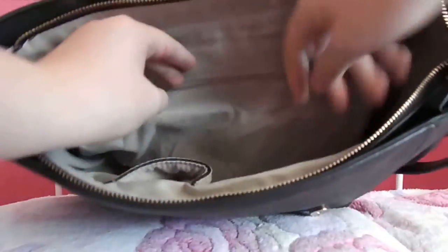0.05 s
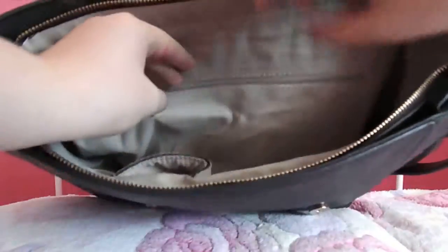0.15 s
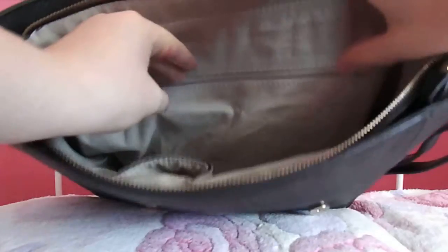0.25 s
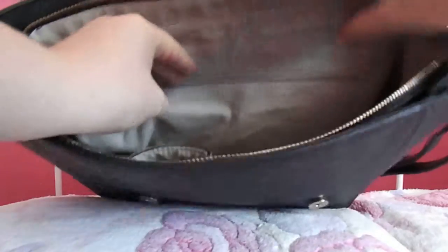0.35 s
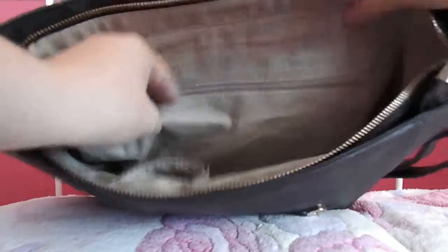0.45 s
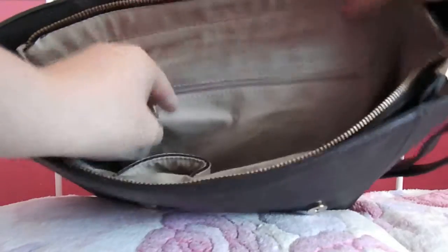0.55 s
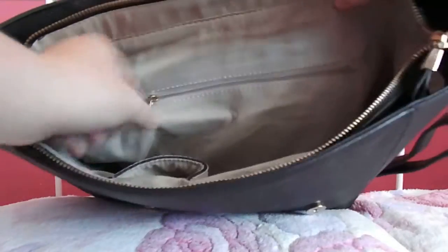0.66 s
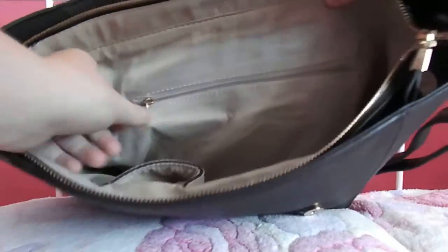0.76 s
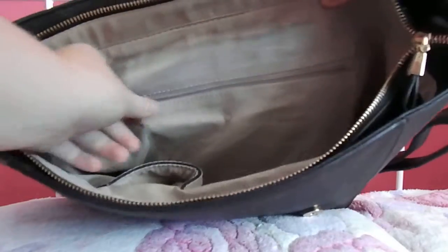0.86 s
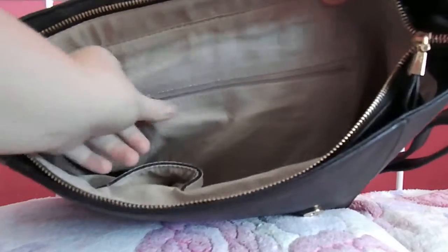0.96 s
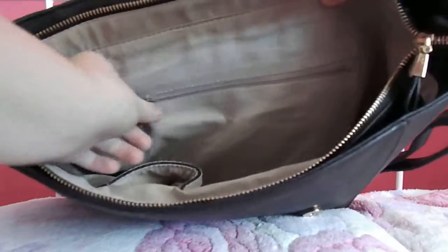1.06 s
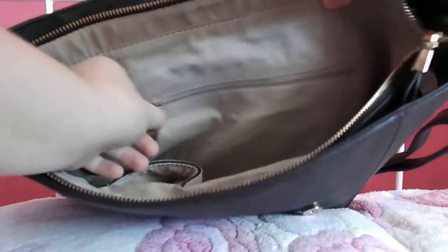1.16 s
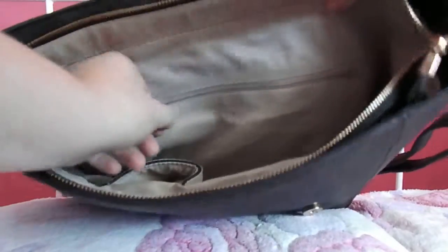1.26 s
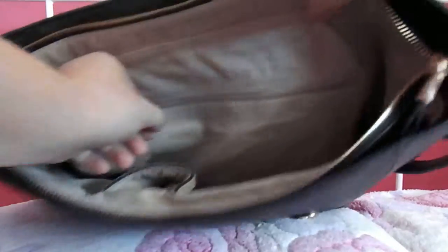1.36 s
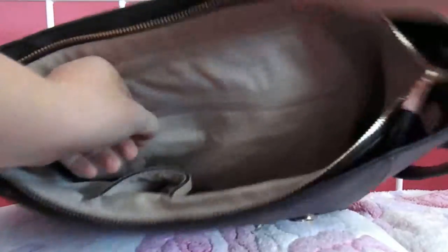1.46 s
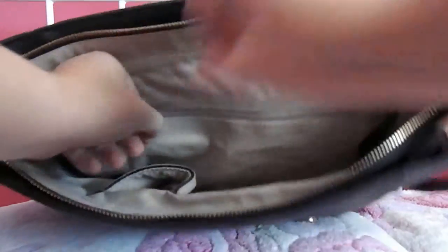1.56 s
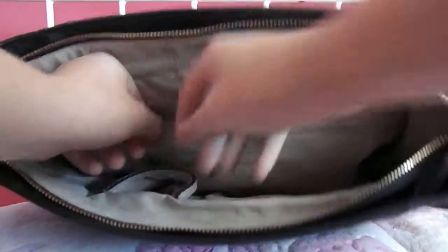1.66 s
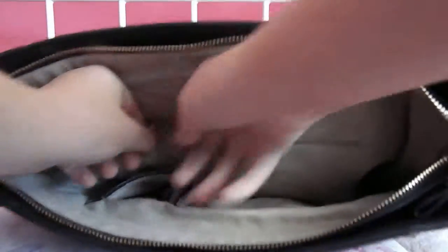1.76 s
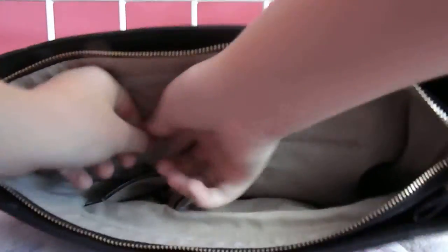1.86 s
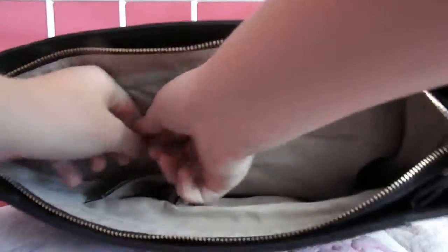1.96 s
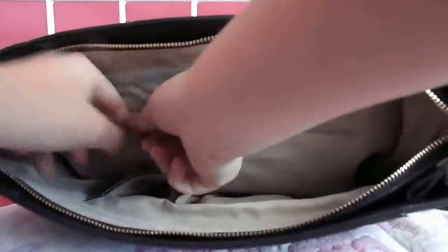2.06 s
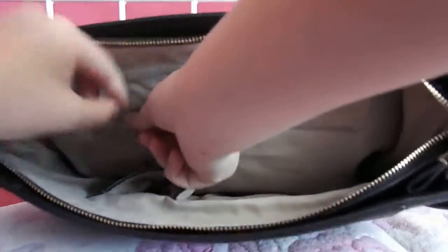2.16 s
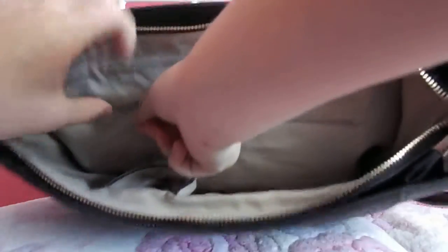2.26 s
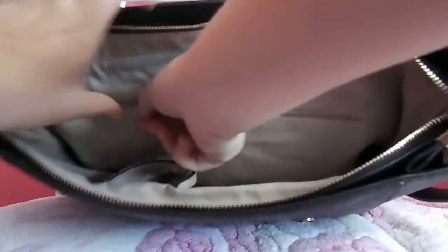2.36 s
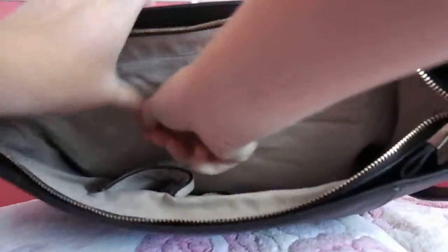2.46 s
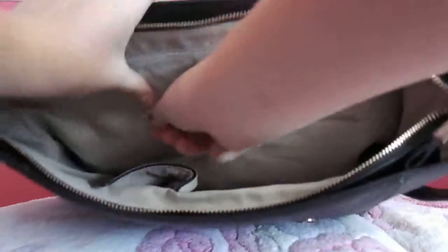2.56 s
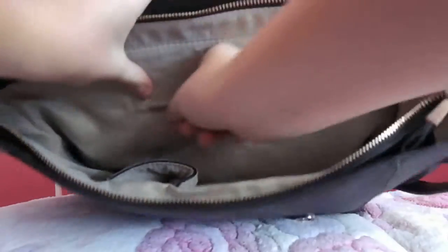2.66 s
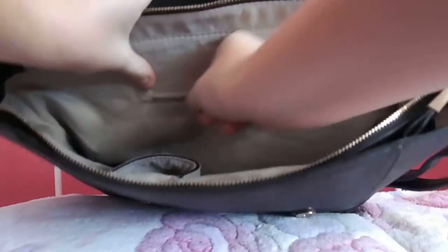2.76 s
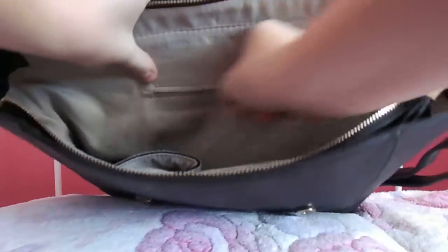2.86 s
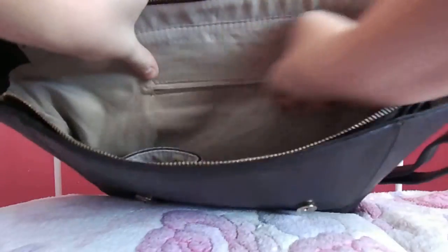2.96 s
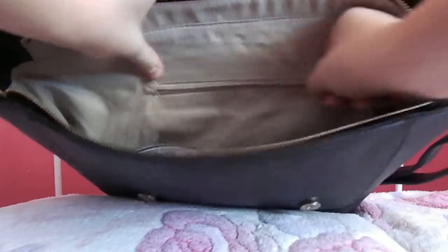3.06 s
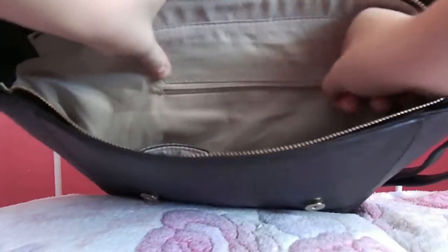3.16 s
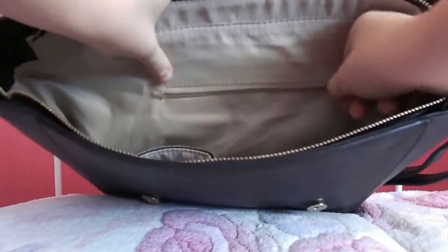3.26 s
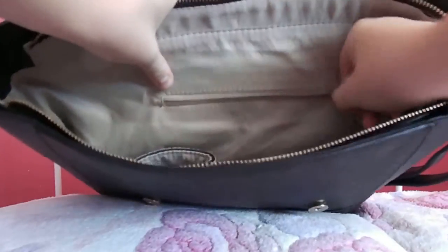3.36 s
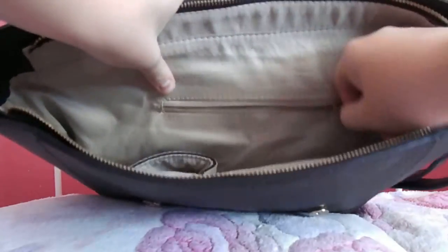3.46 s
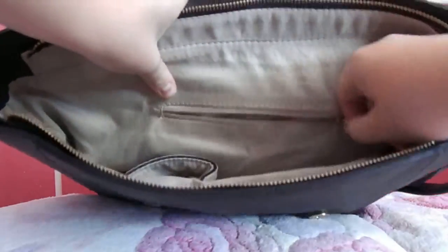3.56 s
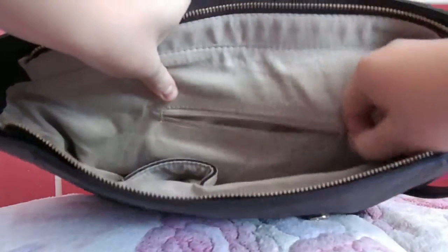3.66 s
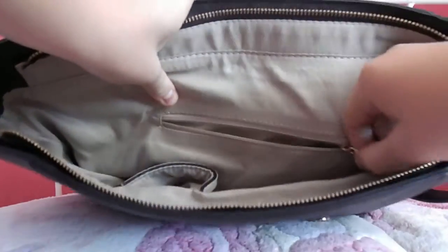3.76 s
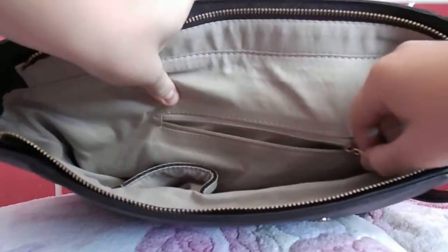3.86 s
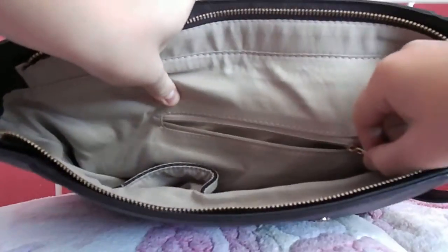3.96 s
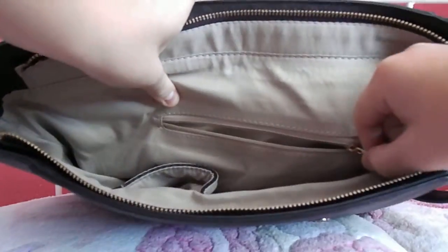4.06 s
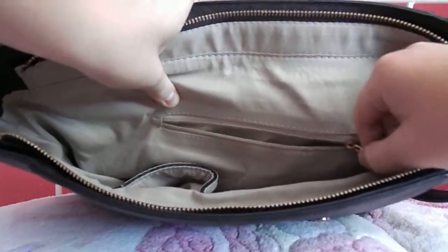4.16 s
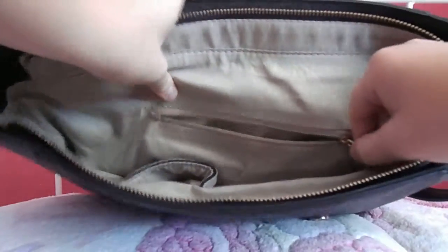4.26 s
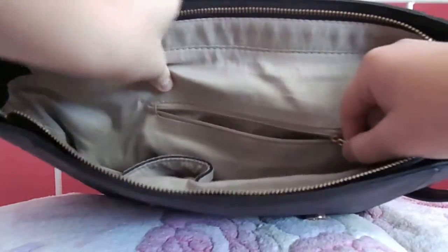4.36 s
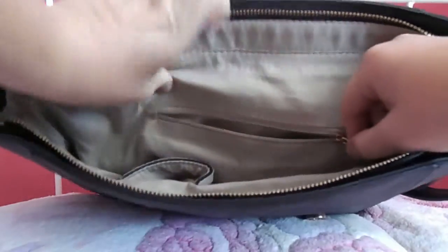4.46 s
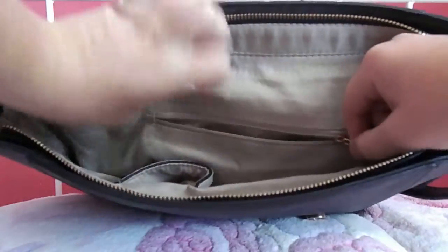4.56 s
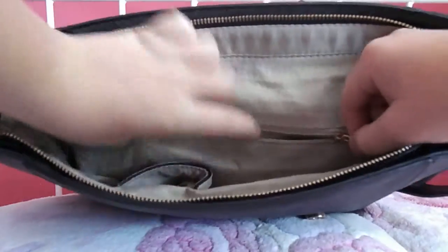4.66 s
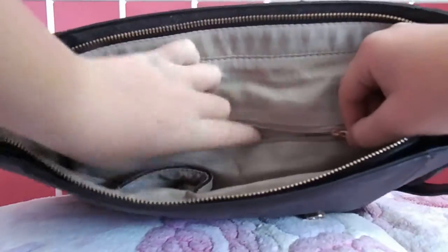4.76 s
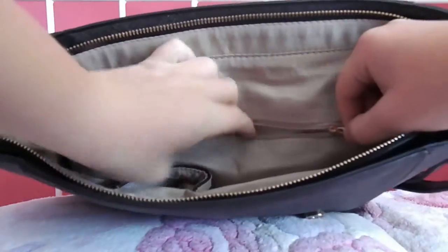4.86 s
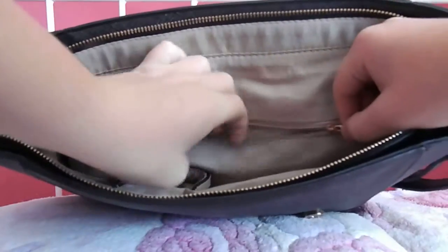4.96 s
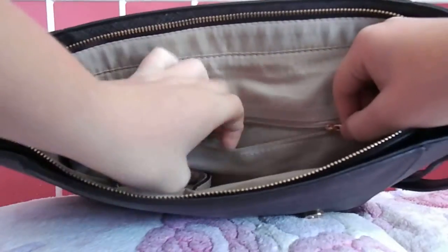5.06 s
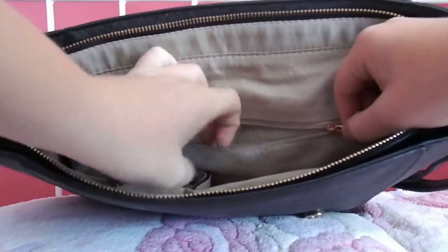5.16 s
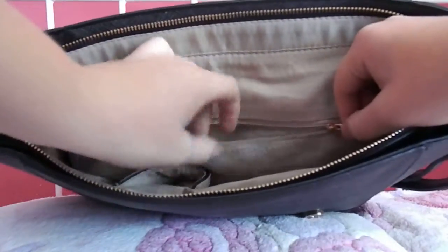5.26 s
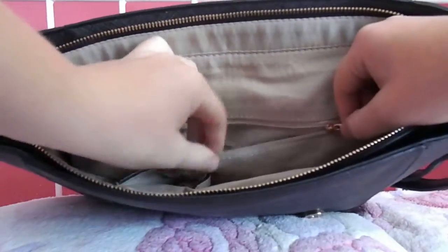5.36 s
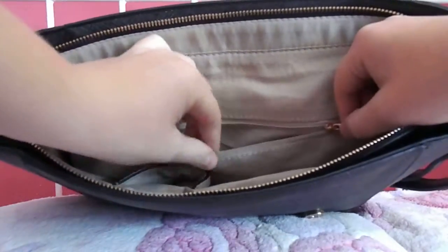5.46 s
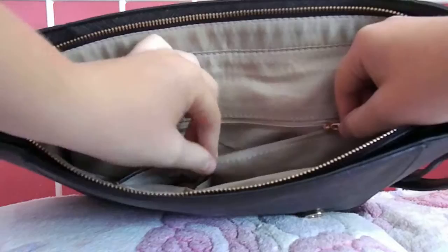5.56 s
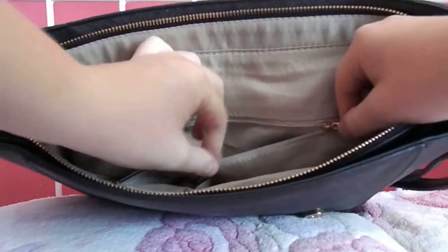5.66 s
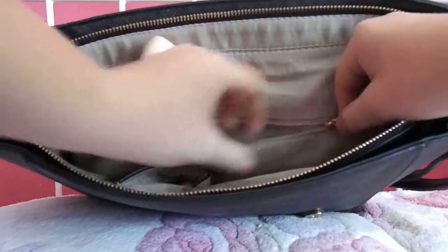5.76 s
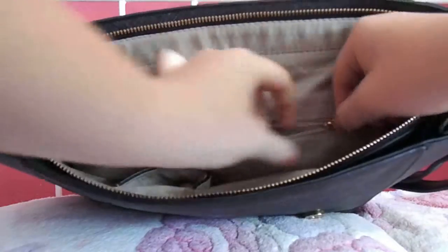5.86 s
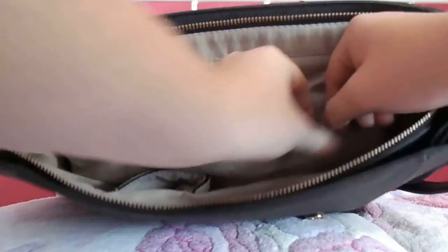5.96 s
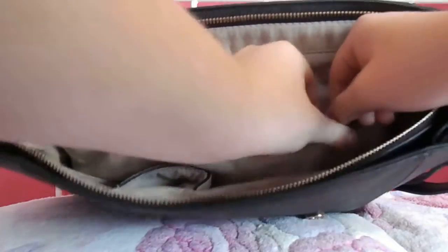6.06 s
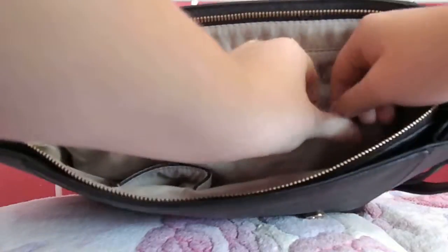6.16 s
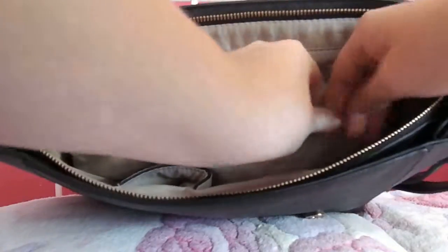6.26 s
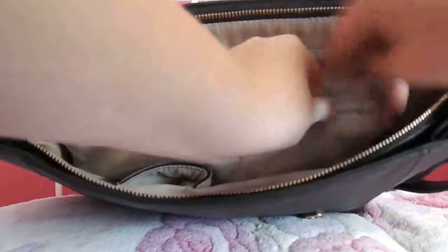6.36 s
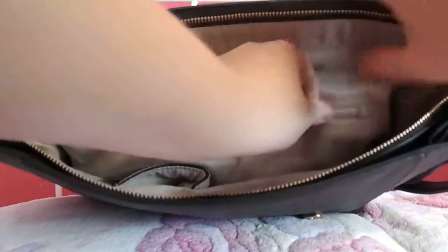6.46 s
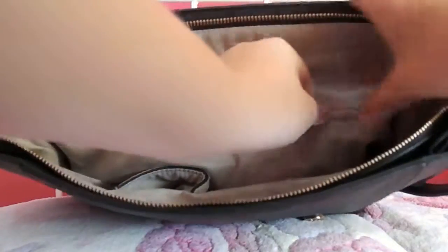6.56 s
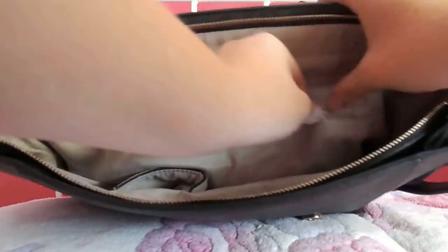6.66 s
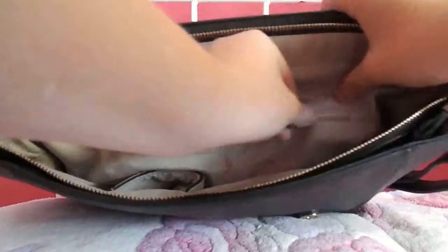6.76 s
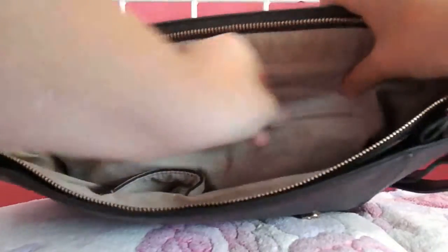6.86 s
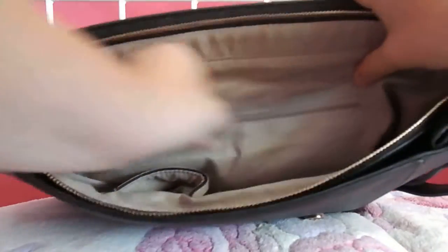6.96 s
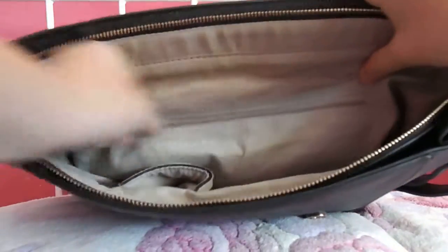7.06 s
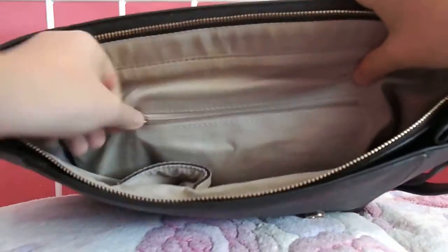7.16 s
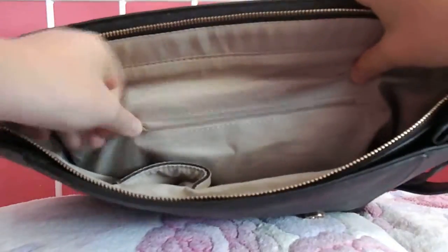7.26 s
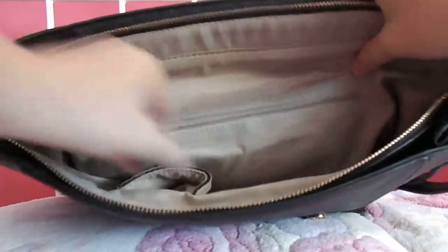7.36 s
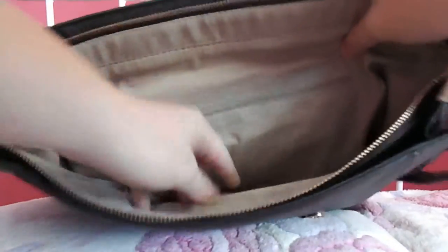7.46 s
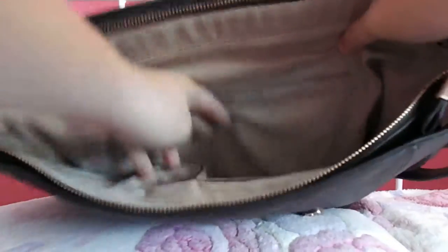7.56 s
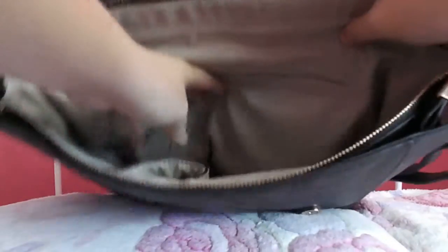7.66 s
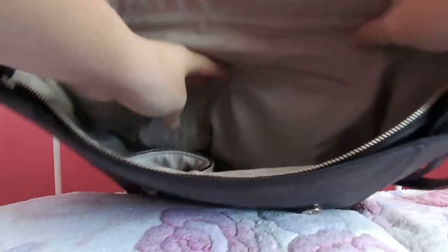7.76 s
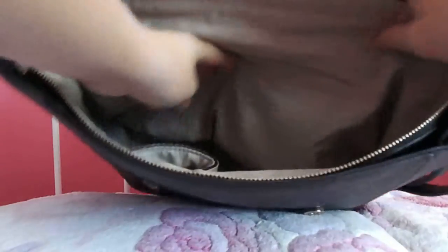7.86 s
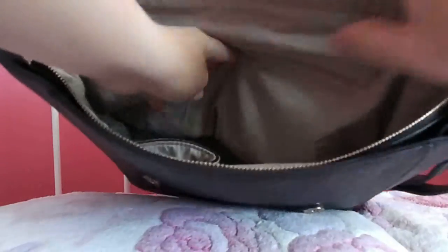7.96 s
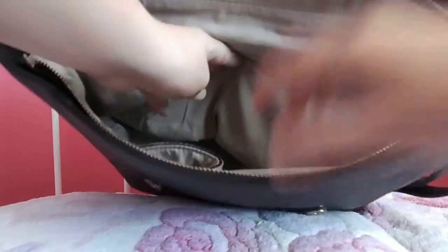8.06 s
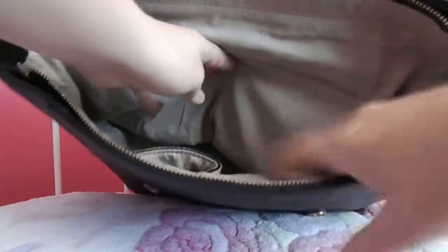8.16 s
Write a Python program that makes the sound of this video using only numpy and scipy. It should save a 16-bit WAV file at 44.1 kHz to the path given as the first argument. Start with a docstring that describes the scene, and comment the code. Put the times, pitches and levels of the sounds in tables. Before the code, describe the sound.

In a quiet small room, very close and mono, hands move inside a lined handbag. From 0 to 2.5 s soft skin-on-cloth swishes come and go with dull bumps, creasing fabric and dry ticks; a thin metal tab clinks near 1 s and chatters at about 1.95 s. At 2.6 s the inner zipper opens: a loose, rattling rasp of half a second that hesitates, speeds up, then slows into separate teeth by 3.1 s. Faint rustling and isolated ticks follow, with a firmer bump at 4.2 s. At 4.53 s one sharp metal snap cracks out, by far the loudest event, with a short bright ring and airy tail. Sparse rubbing continues, busier from 6.2 s with small bumps. At 6.77 s the zipper shuts in under 0.3 s, an even buzz rising in pitch. Tab clinks come around 7.3 s, strong thuds with rough scraping at 7.5 s, then light rustling to the end.

```python
"""Hands in a zippered bag

Inside a lined handbag in a quiet small room, close to a mono microphone: strokes of filtered noise rustle
the lining, impulses with scattered slips make bumps and dry ticks, decaying sines make the tab clink.
The inner pocket's zipper is pulled open and later shut, each tooth a kick and a scrape that buzz at speed.
Between the pulls metal snaps once, sharply; bursts of uneven noise scrape the lining. Near walls answer."""
import sys
import numpy as np
from scipy import signal
from scipy.fft import rfft, irfft
from scipy.io import wavfile
from scipy.ndimage import uniform_filter1d

SR = 44100
rng = np.random.default_rng(int(sys.argv[2]) if len(sys.argv) > 2 else 0)


def bounce(signal):
    """Save signal as a 16-bit WAV file at the path given by the first command-line argument."""
    frames = np.transpose(np.atleast_2d(signal))
    limited = np.clip(frames, -1, 1)
    pcm = np.round(limited * 32767).astype(np.int16)
    wavfile.write(sys.argv[1], SR, pcm)


N = 362590
TIME = np.arange(N) / SR


def from_db(db):
    """Decibels to gain."""
    return 10 ** (np.asarray(db) / 20)


def rms_one(x):
    """Scale to unit power."""
    return x / np.sqrt(np.mean(x ** 2) + 1e-20)


def peak_one(x):
    """Scale to unit height."""
    return x / (np.abs(x).max() + 1e-20)


def in_time(rows, t):
    """The columns of a curve at times t."""
    s, *columns = np.transpose(rows)
    return [np.interp(t, s, column) for column in columns]


def add(out, s, sound):
    """Mix a sound in at time s."""
    start = int(s * SR)
    out[start:start + len(sound)] += sound[:N - start]


def colour(x, spectrum, tilt_db=0, size=2048):
    """Causal (minimum-phase) filter with the given spectrum, tilted in dB per octave."""
    hz, db = np.transpose(spectrum)
    octave = np.log2(np.maximum(np.arange(size // 2 + 1), .5) * SR / size)
    # beyond its end points the spectrum falls by 20 dB per octave
    below = np.maximum(np.log2(hz[0]) - octave, 0)
    above = np.maximum(octave - np.log2(hz[-1]), 0)
    tilt = tilt_db * (octave - octave.mean())
    shape_db = np.interp(octave, np.log2(hz), db) - 20 * (below + above) + tilt
    # folding the cepstrum forward in time gives minimum phase
    cepstrum = irfft(np.log(from_db(shape_db)))
    cepstrum[1:size // 2] *= 2
    cepstrum[size // 2 + 1:] = 0
    response = irfft(np.exp(rfft(cepstrum)))
    return signal.oaconvolve(x, response)[:len(x)]


def drift(rate, count):
    """Slow random wander with unit rms, turning about rate times a second."""
    knots = rng.standard_normal(count)
    return rms_one(np.interp(np.arange(count) * rate / SR, np.arange(count), knots))


def fade(t, t60):
    """Exponential decay by 60 dB in t60 seconds."""
    return np.exp(-np.log(1000) * t / max(t60, 1e-4))


def ring(modes, spread_db):
    """Struck body: decaying sines, each with a strength varied at random by spread_db."""
    t = TIME[:SR // 4]
    out = np.zeros(len(t))
    for hz, db, t60 in modes:
        strength = from_db(db + spread_db * rng.normal())
        out += strength * np.sin(2 * np.pi * hz * t) * fade(t, t60)
    return out


PUSH = np.eye(1, SR // 6)[0]   # a single ideal impulse


def knock(spectrum, tilt_db, t60, scatter):
    """A sudden push of height one, then a dying scatter of tiny slips, through the same body."""
    slips = rng.standard_normal(len(PUSH)) * fade(TIME[:len(PUSH)], t60)
    body = peak_one(colour(PUSH, spectrum, tilt_db))
    return signal.oaconvolve(PUSH + scatter * slips / np.linalg.norm(slips), body)


def friction(power, spectrum, grain_db, flutter_db):
    """Threads catch and let go in uneven grains: noise with a fast and a slower random level."""
    level_db = grain_db * drift(900, N) + flutter_db * drift(60, N)
    grains = rng.standard_normal(N) * from_db(level_db)
    return np.sqrt(power) * rms_one(colour(grains, spectrum))


# Background of the quiet room at the microphone. Each row: frequency in Hz, relative level in dB.
QUIET_SPECTRUM = [(15, -41), (25, -27), (64, -11.5), (120, -4), (190, -1.5), (326, -3), (439, -4.5),
                  (489, -5), (624, -6), (911, -10), (1330, -13), (3620, -20), (4250, -21), (14800, -23.5),
                  (16000, -37)]
QUIET_DB = -60


def quiet_room():
    """Steady coloured noise under everything."""
    return from_db(QUIET_DB) * rms_one(colour(rng.standard_normal(N), QUIET_SPECTRUM, size=8192))


# A hand slides over the lining. Each row: start in seconds, length in seconds, swish level in dB,
# brightness in dB (dull palm low, fingertip high).
HAND_STROKES = [(0.0, 0.087, -59, 10), (0.1, 0.16, -67, 2), (0.3, 0.24, -61, -0.5), (0.51, 0.056, -58.5, 2),
                (0.81, 0.13, -65, -3), (1.06, 0.25, -60, -3), (1.3, 0.16, -62, 6.5), (1.45, 0.18, -64, -7),
                (1.58, 0.24, -60.5, -14), (1.71, 0.064, -59.5, 5), (1.77, 0.18, -61, -1.5),
                (1.91, 0.3, -60.5, -4), (2.13, 0.049, -63, 8), (2.18, 0.18, -67, -21),
                (2.4, 0.26, -64.5, 2), (3.03, 0.16, -68, -21), (3.22, 0.29, -68, 3.5), (3.55, 0.31, -71, 4),
                (4.211, 0.09, -61, -9), (4.63, 0.11, -59.5, -2), (4.72, 0.47, -69, -9),
                (5.89, 0.077, -64.5, -2), (6.19, 0.19, -69.5, -19), (6.66, 0.071, -56.5, 3),
                (6.71, 0.17, -59.5, -2), (7.02, 0.14, -57, -1), (7.24, 0.14, -62, 3), (7.38, 0.34, -59, -6),
                (7.79, 0.11, -62.5, -1), (8.12, 0.17, -62, -2.5)]
STROKE_ATTACK, STROKE_RELEASE = 0.23, 0.44   # shares of a stroke's length
RESTING_DB = -73   # hands that only hold the cloth still stir it


def stroke_power(offset_db, per_brightness):
    """Every stroke swells, holds and lets go; brightness shifts its level."""
    power = np.full(N, from_db(RESTING_DB + offset_db) ** 2)
    for s, length, db, brightness_db in HAND_STROKES:
        phase = np.linspace(0, 1, int(length * SR))
        swell = np.minimum(1, np.minimum(phase / STROKE_ATTACK, (1 - phase) / STROKE_RELEASE))
        stroke_db = db + offset_db + per_brightness * brightness_db
        add(power, max(s, 0), swell * from_db(stroke_db) ** 2)
    return power


# Dull rub, swish and fine hiss of skin on the lining. Each row: frequency in Hz, relative level in dB.
RUB_SPECTRUM = [(60, -21.5), (150, 1), (300, 1), (600, 0.5), (1000, -8), (2000, -11.5), (4000, -46.5)]
SWISH_SPECTRUM = [(700, -3.5), (1500, -7), (2500, 2.5), (3800, 1), (5500, 0), (8000, -7), (12000, -14)]
HISS_SPECTRUM = [(4000, -34), (7000, -9), (9500, -7), (13000, -8.5), (16000, -5.5)]
RUB_DB, HISS_DB = -1, -3   # against the swish
RUB_PER_BRIGHTNESS, HISS_PER_BRIGHTNESS = -0.27, 0.92   # dB for each dB of brightness


def lining():
    """Skin on cloth: a dull rub, a swish and a fine hiss, all driven by the same strokes."""
    rub_power = stroke_power(RUB_DB, RUB_PER_BRIGHTNESS)
    hiss_power = stroke_power(HISS_DB, HISS_PER_BRIGHTNESS)
    rub = friction(rub_power, RUB_SPECTRUM, grain_db=1, flutter_db=3.0)
    swish = friction(stroke_power(0, 0), SWISH_SPECTRUM, grain_db=2.0, flutter_db=1.77)
    hiss = friction(hiss_power, HISS_SPECTRUM, grain_db=1.5, flutter_db=1.0)
    return rub + swish + hiss


# Fingers bump and buckle the bag. Each row: start in seconds, thud level in dB,
# thud tilt in dB per octave, crease level in dB.
FINGER_BUMPS = [(0.12, -50, -6, -44), (0.161, -41, 0, -52), (0.272, -44.5, -1, -45),
                (0.371, -48, -4.5, -61), (0.445, -45, -1, -57), (0.453, -36, 0, -38), (0.456, -35, -5, -62),
                (1.122, -39.5, 3, -53), (1.191, -41.5, -3.5, -53), (1.336, -45.5, -1, -46),
                (1.715, -32.5, 4.5, -51), (2.184, -38, -1.5, -53), (2.204, -39.5, 1, -57),
                (2.234, -37.5, 3, -58), (2.265, -46, 0.5, -54), (2.274, -36, -0.5, -54),
                (2.286, -35.5, 5, -40), (2.472, -38, -8, -45), (2.488, -35, 0.5, -38),
                (4.237, -30, 6.5, -39.5), (4.459, -38.5, 6.5, -49), (4.483, -39.5, -3, -42),
                (4.493, -33.5, -4.5, -53), (6.241, -39, 1.5, -58), (6.289, -40, 2, -46),
                (6.403, -46, 0.5, -43.5), (6.626, -37.5, -4.5, -44), (6.737, -35.5, 1.5, -42),
                (6.751, -50, -1, -51), (7.499, -37.5, 6, -45), (7.52, -26, 4.5, -34.5), (7.53, -27, 4, -40),
                (7.535, -32.5, -5.5, -50), (7.595, -37, 2.5, -45), (7.819, -44, 0.5, -39.5)]
# Soft body of the bag, and its creases. Each row: frequency in Hz, relative level in dB.
THUD_SPECTRUM = [(40, -23), (90, -8), (180, 6), (350, -2), (600, -3.5), (900, -16), (1600, -28.5)]
CREASE_SPECTRUM = [(300, -11.5), (600, 3.5), (1000, 5.5), (1300, -10.5), (1650, -3), (2100, -7),
                   (3000, -12.5), (6000, -16), (15000, -16.5)]


def bumps():
    """The soft bag thuds while its creases give way."""
    out = np.zeros(N)
    for s, thud_db, tilt_db, crease_db in FINGER_BUMPS:
        add(out, s, from_db(thud_db) * knock(THUD_SPECTRUM, tilt_db, t60=0.071, scatter=0.53))
        add(out, s, from_db(crease_db) * knock(CREASE_SPECTRUM, 0, t60=0.052, scatter=2.37))
    return out


# Dry ticks of nails, seams and the slider. Each row: start in seconds, level in dB, tilt in dB per octave.
DRY_TICKS = [(0.276, -40, -6), (0.55, -35, 11.5), (0.868, -44.5, 1), (0.98, -43, -3), (1.025, -47, 5),
             (1.057, -36.5, 4), (1.2, -40.5, 10.5), (1.334, -37.5, -15.5), (1.922, -36.5, 5),
             (1.93, -40, 4.5), (2.105, -40.5, -0.5), (2.162, -43, -1), (2.334, -45, 1.5), (2.701, -43, 8),
             (3.185, -44.5, -2.5), (3.805, -41, 2), (3.9363, -39.5, 0), (6.24, -40.5, 4), (6.309, -39, 11),
             (7.143, -43, 0.5), (7.291, -40.5, -2), (7.821, -37.5, -11)]
# Small hard contact. Each row: frequency in Hz, relative level in dB.
TICK_SPECTRUM = [(400, -20.5), (1100, -11.5), (1600, 10), (2100, 0), (2850, 9), (3500, 7.5), (4100, 5),
                 (6000, 3), (10000, 1.5), (16000, -9)]


def ticks():
    """Small hard contacts: an impulse and a very short scatter of slips."""
    out = np.zeros(N)
    for s, db, tilt_db in DRY_TICKS:
        add(out, s, from_db(db) * knock(TICK_SPECTRUM, tilt_db, t60=0.0089, scatter=2.32))
    return out


# The pull tab clinks and chatters on the slider. Each row: start in seconds, peak of the ring in dB,
# strength of the upper mode in dB.
TAB_CLINKS = [(0.549, -41, -8), (0.979, -42, 10), (1.024, -47, 12), (1.054, -42, 15), (1.951, -32.5, -12),
              (1.955, -42, -4), (1.959, -37, -6), (1.971, -34, -2), (2.036, -39, -1), (7.289, -36, 1),
              (7.305, -44, -2), (7.331, -45, -9), (7.349, -41, -12), (7.47, -38, 10)]
# Lower modes of the metal tab. Each row: frequency in Hz, relative level in dB, t60 in seconds.
TAB_LOWER_MODES = [(10300, -13, 0.022), (11190, -2, 0.023)]
TAB_UPPER_HZ, TAB_UPPER_T60_S = 14430, 0.028
TAB_TICK_DB = -9.5   # the tab's dry tick against its ring


def clinks():
    """The thin ring of the pull tab, damped by the fingers, with a dry tick at each contact."""
    out = np.zeros(N)
    for s, db, upper_db in TAB_CLINKS:
        modes = TAB_LOWER_MODES + [(TAB_UPPER_HZ, upper_db, TAB_UPPER_T60_S)]
        add(out, s, from_db(db) * peak_one(ring(modes, spread_db=0.0)))
        tick = knock(TICK_SPECTRUM, 0, t60=0.033, scatter=2.2)
        add(out, s, from_db(db + TAB_TICK_DB) * tick)
    return out


def levelled(x, size):
    """Even out the running power over size samples, with a floor so that near-silence is not blown up."""
    power = uniform_filter1d(x ** 2, size)
    return x / np.sqrt(np.abs(power) + np.mean(x ** 2) / 100)


def shimmer(x, depth_db, rate):
    """No two teeth meet alike: each half-octave swells and sinks on its own."""
    hz = np.maximum(np.arange(len(x) // 2 + 1), 1) * SR / len(x)
    spectrum = rfft(x)
    out = np.zeros(len(x))
    for centre_hz in 2 ** np.arange(6, 15, .5):
        weight = np.maximum(1 - np.abs(2 * np.log2(hz / centre_hz)), 0)
        band = irfft(spectrum * weight, len(x))
        out += band * from_db(depth_db * drift(rate, len(x)))
    return out


# The hand tugs the cloth taut (panel booms, teeth bite) or lets it slacken. Each row: centre in seconds,
# half-width in seconds, panel change in dB, rasp change in dB.
CLOTH_TUGS = [(2.625, 0.017, 4.5, -1.5), (2.688, 0.01, -2, 1.5), (2.842, 0.01, 5, -0.5),
              (2.93, 0.044, 0.5, 2.5), (3.002, 0.0077, 1.5, 3.5), (6.777, 0.012, 4, 3.5),
              (6.822, 0.0087, 1.5, 4.5), (6.853, 0.012, 4, -4), (6.888, 0.006, -5, -1.5),
              (6.975, 0.017, 4.5, 2.5), (7.007, 0.0062, 11.5, 2)]
USUAL_TEETH_PER_S = 400   # speed at which the slopes below add nothing


def zipper(speed, panel, rasp, jitter, uneven_db, scrape_t60, rise_s, drag, shimmer_db,
           panel_db, panel_slope_db, rasp_db, rasp_slope_db, bright_db, bright_slope_db, ease_s, ease_db):
    """Each tooth kicks the cloth panel and scrapes through the slider; at speed the kicks fuse into a pitch.
    Levels and brightness shift by their slopes per doubling of speed; levels sink as the hand eases off."""
    t = np.arange(speed[0][0], speed[-1][0], 1 / SR)
    rate, = in_time(speed, t)
    doublings = np.log2(rate / USUAL_TEETH_PER_S)
    easing_db = np.interp(t, [t[-1] - ease_s, t[-1]], [0, ease_db])
    boom_db, bite_db = np.zeros((2, len(t)))
    for s, width, panel_change_db, rasp_change_db in CLOTH_TUGS:
        tug = np.exp(-((t - s) / width) ** 2)
        boom_db += panel_change_db * tug
        bite_db += rasp_change_db * tug
    body_db = panel_db + panel_slope_db * doublings + boom_db + easing_db
    metal_db = rasp_db + rasp_slope_db * doublings + bite_db + easing_db
    # teeth arrive a little early or late, and no two are equally tight
    at = np.flatnonzero(np.diff(np.floor(np.cumsum(rate) / SR), prepend=-1))
    chance = rng.standard_normal((len(at), 2))
    at = np.clip(at + jitter * chance[:, 0] * SR / rate[at], 0, len(t) - 1).astype(int)
    kicks = np.zeros(len(t))
    kicks[at] = from_db(uneven_db * chance[:, 1])
    # a scrape builds up as the tooth enters the slider, then dies
    age = TIME[:SR // 30]
    scrape = fade(age, scrape_t60) * (1 - np.exp(-age / rise_s))
    roughness = signal.oaconvolve(kicks, scrape)[:len(t)]
    tooth_scrapes = rms_one(roughness * rng.standard_normal(len(t)))
    push = rms_one(kicks - kicks.mean()) + drag * tooth_scrapes
    body = levelled(colour(push, panel), size=800)
    # the top of the rasp changes with the speed of contact
    metal = shimmer(colour(tooth_scrapes, rasp), shimmer_db, rate=100)
    high_pass = signal.butter(2, 7200, "high", fs=SR, output="sos")
    top = signal.sosfiltfilt(high_pass, metal)
    top_gain = from_db(bright_db + bright_slope_db * doublings)
    metal = levelled(metal + (top_gain - 1) * top, size=900)
    out = np.zeros(N)
    add(out, t[0], from_db(body_db) * body + from_db(metal_db) * metal)
    return out


# Slider speed while opening. Each row: time in seconds, speed in teeth per second.
OPENING_SPEED = [(2.598, 237), (2.63, 224), (2.685, 87.5), (2.75, 223), (2.83, 357), (2.92, 432),
                 (2.995, 330), (3.025, 110), (3.12, 45)]
# Cloth panel that carries the zipper, and rasp of the teeth. Each row: frequency in Hz, relative level in dB.
OPENING_PANEL = [(53, -68), (90, -12), (134, -11.5), (255, -7.5), (344, -3), (520, -2.5), (595, 0),
                 (760, -19.5), (1180, -11.5), (1510, -32), (1800, -18), (2340, -39), (3960, -120)]
OPENING_RASP = [(820, -52), (1400, -12), (2020, 1.5), (2380, -7), (3720, 0), (4300, -5), (4900, -2),
                (5320, -7.5), (6080, -2), (6660, -11.5), (7220, -7), (9320, -12), (15200, -12),
                (16000, -24)]


def opening():
    """Parting teeth rattle loosely."""
    return zipper(OPENING_SPEED, OPENING_PANEL, OPENING_RASP, jitter=0.15, uneven_db=2.0,
                  scrape_t60=0.012, rise_s=0.00034, drag=0.76, shimmer_db=2.0,
                  panel_db=-43.5, panel_slope_db=5.0, rasp_db=-43.5, rasp_slope_db=4.0,
                  bright_db=0.5, bright_slope_db=-0.3, ease_s=0.044, ease_db=-7)


# One hard metal snap. Each row: start in seconds, level of the crack in dB.
SNAP_TIMES = [(4.5275, -5)]
# Body of the crack. Each row: frequency in Hz, relative level in dB.
SNAP_SPECTRUM = [(200, -18), (400, -1.5), (680, 3), (1100, -7.5), (1580, 4.5), (2300, -12), (2900, -0.5),
                 (3500, -2), (4400, -11), (6400, -15), (9200, -9.5), (10200, 0), (12000, -12),
                 (15500, -9.5)]
# Ringing metal. Each row: frequency in Hz, relative level in dB, t60 in seconds.
SNAP_RINGING = [(1560, -25, 0.0061), (3060, -24, 0.016), (10210, -27.5, 0.15), (10200, -37, 0.069),
                (9700, -38, 0.05), (10750, -34, 0.035), (12720, -34, 0.035), (14700, -28, 0.02)]
# The snap's bright, noisy tail in the room. Each row: frequency in Hz, relative level in dB.
SNAP_TAIL_SPECTRUM = [(900, -8), (2300, 6), (4000, 0), (5500, 0), (8000, -5), (12000, 1), (15500, -3)]
SNAP_RING_DB, SNAP_TAIL_DB = -5, -40   # against the crack
SNAP_TAIL_T60_S = 0.3


def snap():
    """Metal springs against metal: a crack, a brief ring and a bright, noisy tail dying away in the room."""
    out = np.zeros(N)
    t = TIME[:SR // 3]
    for s, db in SNAP_TIMES:
        add(out, s, from_db(db) * knock(SNAP_SPECTRUM, 0, t60=0.006, scatter=0.2))
        add(out, s, from_db(db + SNAP_RING_DB) * ring(SNAP_RINGING, spread_db=1.0))
        noise = rms_one(colour(rng.standard_normal(len(t)), SNAP_TAIL_SPECTRUM))
        add(out, s, from_db(db + SNAP_TAIL_DB) * noise * fade(t, SNAP_TAIL_T60_S))
    return out


# Short rough scrapes and crackles of the lining. Each row: start in seconds, length in seconds, level in dB.
LINING_SCRAPES = [(6.292, 0.046, -62), (7.494, 0.13, -61), (7.879, 0.04, -60)]
# Colour of these scrapes. Each row: frequency in Hz, relative level in dB.
SCRAPE_SPECTRUM = [(1200, -18), (1750, 5), (2100, -10), (2500, 9.5), (3100, -6.5), (4000, -4), (7000, -27)]


def scrapes():
    """Short rough scrapes and crackles of the lining: bursts of noise with an uneven level."""
    power = np.zeros(N)
    for s, length, db in LINING_SCRAPES:
        add(power, s, from_db(db) ** 2 * np.hanning(int(length * SR)))
    return friction(power, SCRAPE_SPECTRUM, grain_db=2.5, flutter_db=2.5)


# Slider speed while shutting. Each row: time in seconds, speed in teeth per second.
SHUTTING_SPEED = [(6.769, 225), (6.81, 235), (6.84, 390), (6.86, 465), (6.905, 478), (6.94, 590),
                  (6.965, 612), (7.01, 614), (7.024, 675), (7.046, 650)]
# Cloth panel and rasp of the teeth. Each row: frequency in Hz, relative level in dB.
SHUTTING_PANEL = [(90, -28), (220, -2), (420, 2), (610, 5), (800, -8.5), (1000, -2.5), (1220, -4.5),
                  (1500, -12.5), (2200, -15)]
SHUTTING_RASP = [(1300, 2), (1750, -9.5), (2150, -8), (2520, -2.5), (3100, -4), (3900, -0.5), (4700, -4),
                 (5600, -6.5), (8000, -9), (10300, -10.5), (12500, -13.5), (16000, -17)]


def shutting():
    """Meshing teeth run evenly and sing."""
    return zipper(SHUTTING_SPEED, SHUTTING_PANEL, SHUTTING_RASP, jitter=0.035, uneven_db=1.6,
                  scrape_t60=0.012, rise_s=0.00041, drag=0.28, shimmer_db=1.5,
                  panel_db=-44.0, panel_slope_db=2.0, rasp_db=-45.0, rasp_slope_db=7.5,
                  bright_db=0.0, bright_slope_db=4.0, ease_s=0.03, ease_db=-8)


# Diffuse tail of the small room. Each row: frequency in Hz, relative level in dB.
ROOM_SPECTRUM = [(100, -3.5), (300, 2.5), (620, -3.5), (1200, -6), (3000, -4), (7000, -6.5), (10000, -1.5),
                 (16000, -7.5)]
# Reflections from the near walls. Each row: delay in seconds, level in dB.
WALL_ECHOES = [(.0092, -20), (.0105, -42), (.0172, -31), (.0203, -28)]
# A lingering resonance. Each row: frequency in Hz, level in dB, t60 in seconds.
ROOM_RESONANCE = [(628, -67, 0.37)]
ROOM_T60_S = 0.45


def room(x, wet_db):
    """Reflections from the near walls, then a short diffuse tail with one lingering note."""
    t = TIME[:SR // 2]
    build_up = 1 - fade(t, 0.014)
    tail = colour(rng.standard_normal(len(t)), ROOM_SPECTRUM) * fade(t, ROOM_T60_S) * build_up
    response = from_db(wet_db) * tail / np.linalg.norm(tail)
    for delay, db in WALL_ECHOES:
        response[int(delay * SR)] += from_db(db)
    add(response, 0, ring(ROOM_RESONANCE, spread_db=0))
    return x + signal.oaconvolve(x, response)[:N]


def scene():
    """Two pulls and the handling around them, over the quiet of the room; both channels are alike."""
    bag = lining() + bumps() + ticks() + clinks() + opening() + scrapes() + shutting()
    mono = quiet_room() + room(bag, wet_db=-14) + room(snap(), wet_db=-18)
    return np.tile(mono, (2, 1))


def record(dry):
    """The top is cut steeply above 15.9 kHz."""
    low_pass = signal.ellip(10, .1, 80, 15900, fs=SR, output="sos")
    return signal.sosfilt(low_pass, dry)


dry = scene()
out = record(dry)
bounce(out)
```